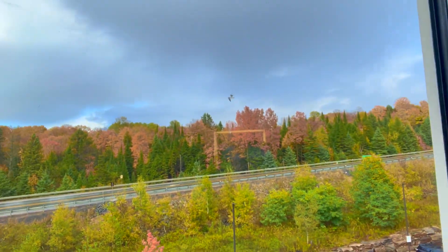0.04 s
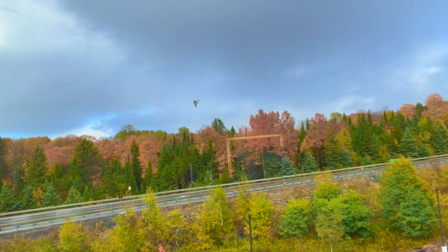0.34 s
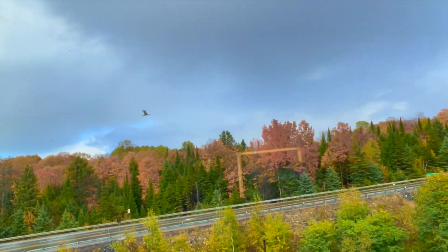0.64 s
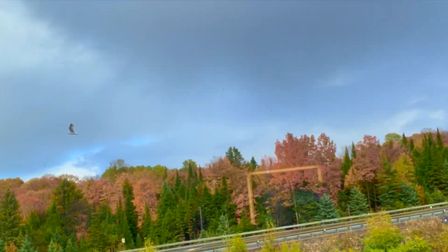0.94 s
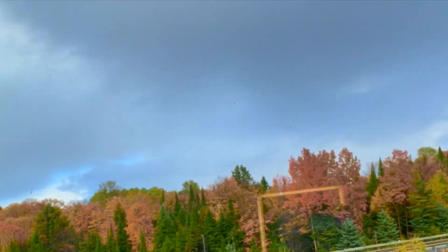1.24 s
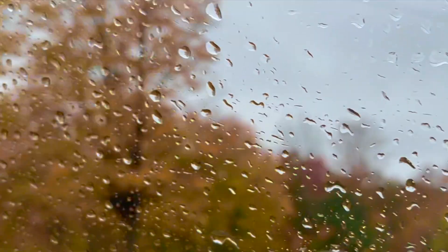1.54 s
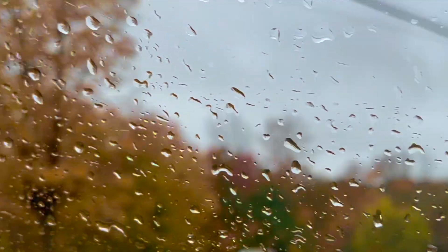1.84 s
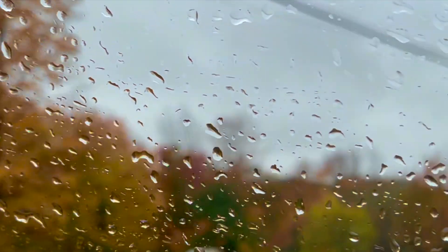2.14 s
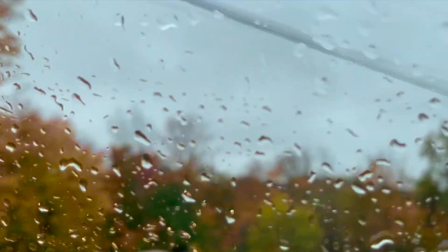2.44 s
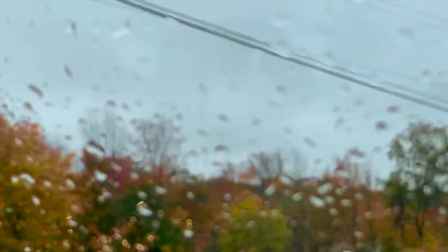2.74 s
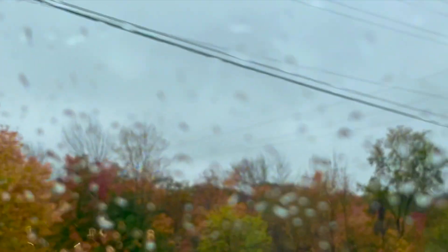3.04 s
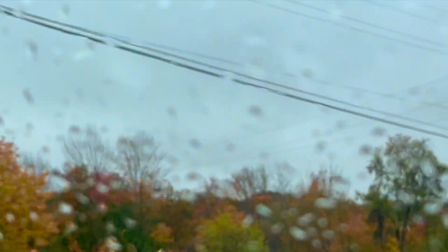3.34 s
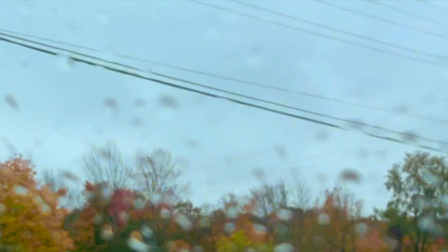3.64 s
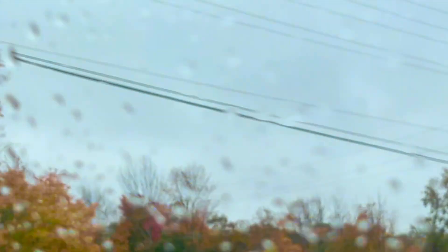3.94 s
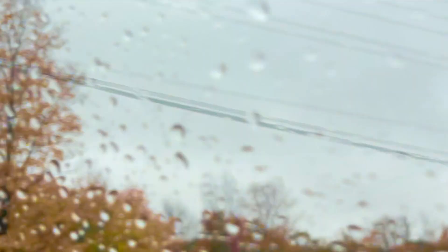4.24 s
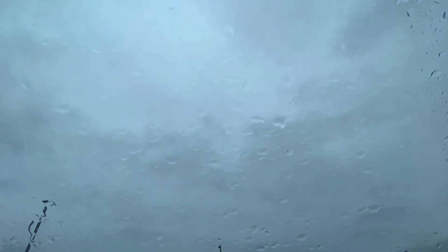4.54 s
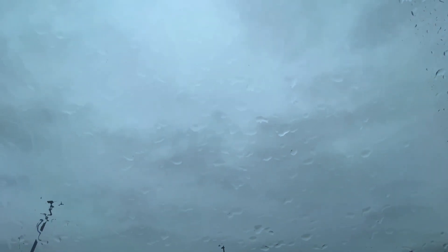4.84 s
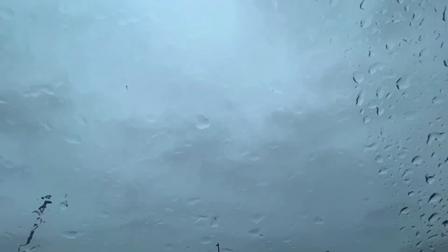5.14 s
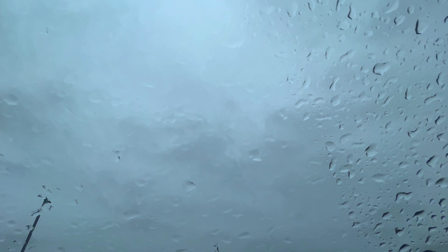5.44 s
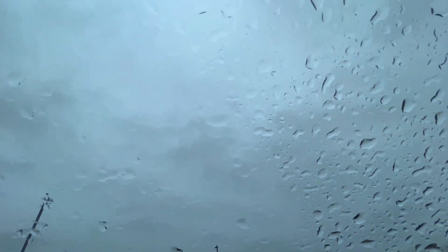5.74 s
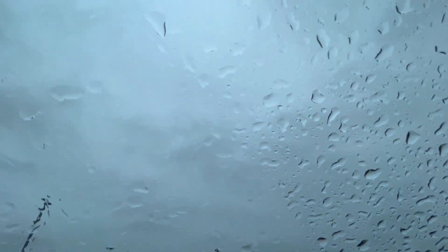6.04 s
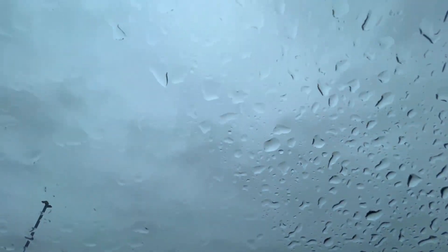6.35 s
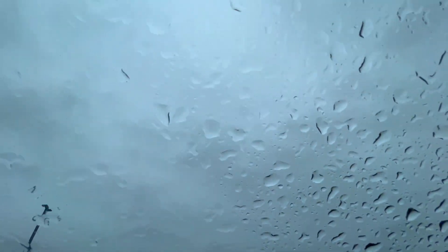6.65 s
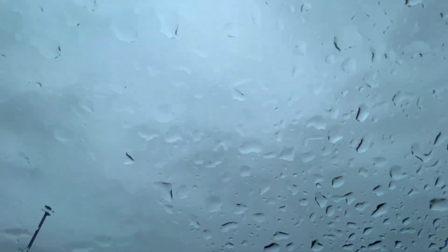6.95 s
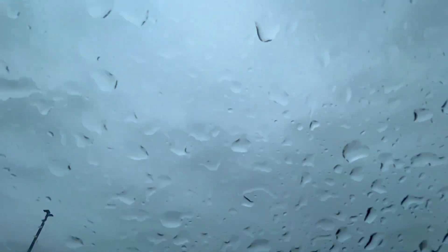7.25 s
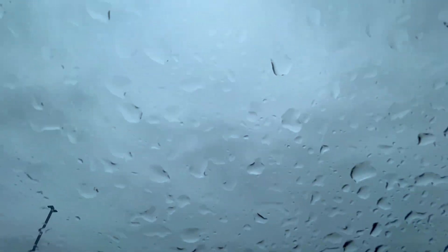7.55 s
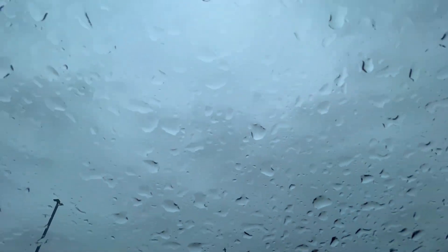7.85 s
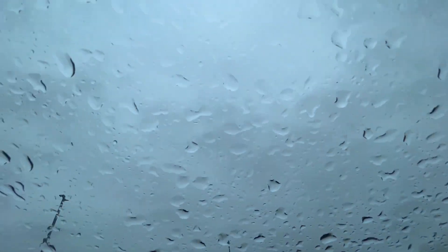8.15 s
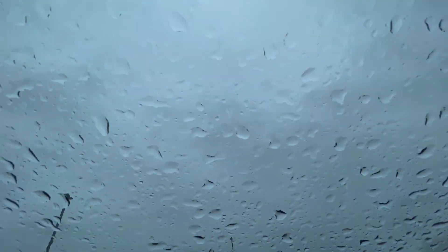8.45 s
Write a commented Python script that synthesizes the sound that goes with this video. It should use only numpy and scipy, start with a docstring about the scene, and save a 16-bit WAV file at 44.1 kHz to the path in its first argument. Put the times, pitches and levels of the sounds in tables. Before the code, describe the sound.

The sound is heard from inside a moving car. From the start, wind buffets the side window with a deep, lumpy rumble that swells in gusts, and short dull thuds cluster between about 0.8 and 2 seconds. A tiny, very faint squeak comes at 0.3 seconds. At 1.5 seconds rain sets in on the glass: a soft, fine wash with single drops ticking above it, busiest until about 3.5 seconds. A strong gust swells near 3.9 seconds, followed by the loudest double thump at about 4.2. After further gusts around 4.8 and 5.2 seconds, the wind dies away and is gone by 6. The rest is much quieter, with rain pattering on and a few sharper drops near 6.9 and 8.3 seconds. Low tyre rumble and a faint engine drone continue underneath until the end, just past 8.5 seconds.

```python
"""Wind buffets the side window of a moving car: swirls of air rumble and thud, then die away.
After a second and a half rain sets in on the glass. Countless droplets blur into a fine wash,
and single drops tick above it. A tiny squeak comes in an early gust.
Underneath, the tyres rumble through the car's body and the engine drones low."""
import sys
import numpy as np
from scipy import signal
from scipy.io import wavfile
from scipy.ndimage import uniform_filter1d

SR = 44100
rng = np.random.default_rng(int(sys.argv[2]) if len(sys.argv) > 2 else 0)


def file_out(sig):
    """Save sig as 16-bit WAV at sys.argv[1]."""
    # one column per channel
    cols = np.atleast_2d(sig).T
    # limit, then scale
    lim = np.clip(cols, -1, 1)
    pcm = np.round(lim * 32767).astype(np.int16)
    wavfile.write(sys.argv[1], SR, pcm)


N = 375379

# how much fine spray reaches the glass: t/s, level/dB added to SPRAY_DB
SPRAY_AMOUNT = [(1.6, -1.5), (3.0, -1), (3.3, -3), (3.7, -1.5), (5.2, -3.5), (5.7, -10), (6.7, -5.5),
                (7.8, -9), (8.5, -7)]
SPRAY_DB = -78


def wind(deepen=0.35):
    """Air rumbles past the window in lumps, louder and deeper in each gust, then dies away."""
    # steady flow: t/s, level/dB, brightness/(dB per octave)
    airflow = [(0.0, -39.5, 1), (0.6, -39, 1), (1.2, -34, 1.5), (1.9, -40.5, 1.5), (2.4, -41, 0.5),
               (3.0, -39, 1.5), (3.35, -41.5, -1), (3.95, -40, 1), (4.45, -39, -2), (5.25, -37, -1.5),
               (5.6, -50, -2.5), (6.0, -67, 2)]
    # gusts on top of it: t/s, rise/dB, half-length/s
    gusts = [(0.11, 5, 0.11), (0.43, 4, 0.025), (1.27, 0.5, 0.1), (1.462, 6.5, 0.1), (1.79, 6.5, 0.06),
             (2.108, 6, 0.16), (2.72, 6.5, 0.034), (3.045, 5, 0.089), (3.866, 8, 0.16), (4.27, 4, 0.12),
             (4.757, 6, 0.13), (5.176, 0, 0.18)]
    # tone of the swirling air: f/Hz, level/dB
    colour = [(22, -19.5), (35, -10.5), (60, -7), (100, 3), (200, 0.5), (340, -6.5), (450, -10.5),
              (680, -21), (1000, -26), (1500, -50), (2300, -51), (3300, -60.5), (5000, -68.5)]
    # how alike left and right are: f/Hz, likeness (1 = the same)
    likeness = [(40, .94), (150, 0.89), (500, 0.96), (1100, 0.88), (2200, 0.6), (5000, .6)]
    # left minus right: f/Hz, level/dB
    balance = [(35, 10.5), (80, 1), (170, 0.5), (350, -2), (700, -3.5), (2000, -7.5)]
    strength_db, brightness = in_time(airflow)
    rise_db = swells(gusts)
    tilt = brightness - deepen * rise_db   # bigger swirls rumble lower
    air = coloured(turbulence(), colour, likeness, balance, tilt_db=tilt, flutter_db=1.37)
    return butter(air, 3000, "low") * from_db(strength_db + rise_db + 0.99 * drift(22) - 0.2)


def thuds(attack_s=0.0014, length_s=0.04):
    """Single swirls of air thump the cabin: a sudden, short burst of pressure with a dull rush on top."""
    # one swirl a row: t/s, thump level/dB, f/Hz, rush level/dB
    swirls = [(0.106, -21.5, 151, -46), (0.268, -21, 140, -32), (0.754, -23, 86, -35),
              (0.898, -17, 170, -31), (0.919, -18.5, 102, -26.5), (1.006, -19.5, 186, -27.5),
              (1.164, -18.5, 109, -27.5), (1.227, -19, 128, -36), (1.259, -21, 255, -40.5),
              (1.413, -22.5, 103, -37), (1.564, -23, 143, -48), (1.728, -16.5, 142, -40),
              (2.014, -19.5, 145, -34), (2.066, -21, 104, -36.5), (3.566, -23, 110, -42),
              (4.137, -10, 111, -32), (4.189, -10.5, 100, -39), (5.153, -23, 46, -51),
              (5.273, -25, 108, -46)]
    out, t = np.zeros((2, N)), np.arange(SR // 4) / SR
    burst = (1 - np.exp(-(t / attack_s) ** 2)) * np.exp(-(t / length_s) ** 2)
    noises = rng.standard_normal((len(swirls), 2, 2, len(t) + SR // 10))
    for (s, thump_db, hz, rush_db), (thump_noise, rush_noise) in zip(swirls, noises):
        thump = from_db(thump_db - 4.5) * swirl(thump_noise, 0.63 * hz, 1.48 * hz)
        rush = from_db(rush_db - 3.5) * swirl(rush_noise, 250, 564) * from_db([[-1.3], [1.3]])
        add(out, (thump + rush) * burst, s)
    return out


def swirl(noise, low_hz, high_hz, side_db=-14.5):
    """Swirling air that keeps an even strength and carries little above its own pitch."""
    band = butter(noise, [low_hz, high_hz], "band")
    power = np.abs(uniform_filter1d(band ** 2, size=SR // 60, axis=1))
    even = band / np.sqrt(power + 1e-20)
    mid, side = butter(even, high_hz * 1.3, "low")[:, SR // 10:]   # skip ahead until the filters settle
    return stereo(mid, from_db(side_db) * side)


def rain(start_s=1.53, rise_s=0.031, wash_db=-55.0):
    """Droplets drum on the glass and blur into a wash; the finest spray adds a thin crackle."""
    # tone of the wash through the glass: f/Hz, level/dB
    wash_colour = [(250, -3), (450, 5), (750, 8), (1200, 4.5), (1700, -2.5), (2400, -1.5), (3300, -10),
                   (4300, -20), (5500, -28), (8000, -55.5), (14000, -57)]
    # tone of the finest droplets: f/Hz, level/dB
    spray_colour = [(2500, -10.5), (4000, 7.5), (5800, 8.5), (7000, -13.5), (8500, 0), (10000, -9),
                    (14000, -24)]
    # how alike left and right are: f/Hz, likeness
    likeness = [(400, 1), (1000, 0.76), (2200, 0.83), (4000, 0.91), (10000, 0.47)]
    # left minus right: f/Hz, level/dB
    balance = [(400, -0.1), (1000, -0.6), (8000, .3)]
    # flurries of thicker rain: t/s, rise/dB, half-length/s
    flurries = [(1.76, 1, 0.2), (2.14, 1.8, 0.073), (2.4, 1.8, 0.028), (3.03, -0.3, 0.1),
                (3.45, 2.5, 0.066), (3.85, 1.2, 0.08), (6.7, 0.4, 0.51)]
    amount_db, = in_time(SPRAY_AMOUNT)
    fade_in = .5 + .5 * np.tanh((np.arange(N) / SR - start_s) / (2 * rise_s))
    flurry_db = swells(flurries)
    spatter = np.maximum(drift(18), 0) ** 2   # quick, random jumps in level
    droplets = patter(per_s=1200, spread_db=3.0, blur=1.33)
    wash = coloured(droplets, wash_colour, likeness, balance, flutter_db=1.1)
    fine_droplets = patter(per_s=650, spread_db=0.5, blur=1.5)
    spray = coloured(fine_droplets, spray_colour, likeness, balance)
    wash_gain = from_db(wash_db + 0.03 * amount_db + flurry_db + 0.31 * spatter)
    spray_gain = from_db(SPRAY_DB + amount_db + 0.9 * flurry_db + .5 * spatter)
    return fade_in * (wash_gain * wash + spray_gain * spray)


def patter(per_s, spread_db, blur):
    """Random hits of uneven size over a blur of countless smaller ones."""
    sizes = from_db(spread_db * np.minimum(rng.exponential(1, N), 5))
    lands = rng.random(N) < per_s * from_db(2 * drift(5)) / SR
    return rms_one(sizes * lands) * rng.choice([-1, 1], (2, 2, N)) + blur * turbulence()


def heavy_drops():
    """A few big drops land close by and stand out of the wash."""
    # one drop a row: t/s, tap level/dB, tap f/Hz, splash level/dB, splash f/Hz
    drops = [(1.64, -47, 2300, -73, 6000), (1.6985, -44, 3500, -53, 4400), (1.754, -54, 3500, -59, 7100),
             (1.861, -50, 3300, -75, 6000), (1.9195, -51, 4200, -57, 5400), (1.987, -47, 2600, -58, 4500),
             (2.098, -50, 3500, -61, 4500), (2.1385, -41, 2460, -65, 6000), (2.228, -54, 4000, -55, 7100),
             (2.3932, -46, 2400, -64, 6000), (2.702, -47, 2400, -49, 5400), (2.713, -54, 3500, -57, 5500),
             (2.7885, -50, 3600, -64, 7000), (2.9433, -56, 3000, -61, 6800), (3.1312, -46, 3300, -53, 3600),
             (3.2065, -48, 2600, -62, 6500), (3.396, -49, 2800, -62, 4000), (3.447, -44, 4180, -64, 8000),
             (3.4635, -44, 3660, -58, 8500), (3.482, -56, 3500, -59, 7500), (3.5145, -56, 3500, -61, 6700),
             (3.83, -55, 3500, -60, 7200), (4.174, -55, 4000, -57, 6400), (4.914, -54, 3700, -63, 7000),
             (5.011, -55, 4000, -59, 5800), (5.134, -51, 4000, -60, 4800), (6.319, -54, 3800, -63, 6000),
             (6.8225, -51, 3800, -59, 5500), (6.8964, -43.5, 3600, -58, 3600),
             (7.38, -60, 4000, -64, 11200), (8.316, -41, 2500, -68, 4990), (8.4565, -46, 2450, -65, 4500)]
    out = np.zeros((2, N))
    for (s, *tap_and_splash), noise in zip(drops, rng.standard_normal((len(drops), 2, SR // 20))):
        add(out, from_db(-1.5) * drop(noise, *tap_and_splash, splash_s=0.003), s)
    return out


def light_drops(count=260, tap_hz=3400, splash_hz=6000):
    """Small drops tick at random, louder in thicker spray; smaller ones are higher and fainter."""
    out = np.zeros((2, N))
    amount_db, = in_time(SPRAY_AMOUNT)
    first_s = SPRAY_AMOUNT[0][0]
    chances = rng.random((count, 3))
    for (when, pitch, softness), noise in zip(chances, rng.standard_normal((count, 2, SR // 40))):
        s = first_s + when * (N / SR - first_s - .05)
        octave = 1.6 * (pitch - .5)
        above_spray_db = 12 - 7 * octave - 1.4 * np.log(softness + .03)
        db = SPRAY_DB + amount_db[int(s * SR)] + above_spray_db
        tick = drop(noise, db + 7, tap_hz * 2 ** octave, db, splash_hz * 2 ** octave, splash_s=0.0022)
        add(out, tick, s)
    return out


def drop(noise, tap_db, tap_hz, splash_db, splash_hz, splash_s, width_octaves=0.55):
    """A drop taps the glass for two or three vibrations and splashes with a short, high hiss."""
    t = np.arange(noise.shape[1]) / SR
    age = t * tap_hz / 0.82   # the tap is strongest after 0.82 vibrations
    tap = age * np.exp(1 - age) * np.sin(2 * np.pi * tap_hz * t)
    edges_hz = splash_hz * 2 ** (np.array([-.5, .5]) * width_octaves)
    fade = np.exp(-t / splash_s) + 0.073 * np.exp(-t / .012)   # a quick fall, then a faint tail
    mid, side = butter(noise * fade, edges_hz, "band")
    splash = stereo(mid, .3 * side) / np.abs(mid).max()
    return from_db(tap_db) * tap + from_db(splash_db) * splash


def road():
    """The rolling tyres rumble through the car's body."""
    # tone of tyres and body: f/Hz, level/dB
    colour = [(22, -4.5), (33, -2.5), (46, 2), (75, -0.5), (105, -1), (160, -5), (270, -9.5), (350, -14.5),
              (600, -22), (1500, -26), (3000, -60.5)]
    # how alike left and right are: f/Hz, likeness
    likeness = [(50, 0.69), (200, 0.77), (600, 0.42)]
    # left minus right: f/Hz, level/dB
    balance = [(60, 2.5), (180, 4.8), (500, .5)]
    return from_db(-46.0) * coloured(turbulence(), colour, likeness, balance, flutter_db=1.0)


def engine():
    """The engine's rapid firing makes a low, slightly wavering drone, louder on the left."""
    # how fast it fires: t/s, f/Hz
    firing = [(0, 66.47), (5.8, 67.6), (7.2, 67.94), (8.5, 66.77)]
    # tones of the drone: multiple of the firing rate, level/dB
    tones = [(1, -61), (2, -57), (3, -57)]
    firing_hz, = in_time(firing)
    phase = 2 * np.pi * np.cumsum(firing_hz * (1 + 0.0034 * drift(3.0))) / SR
    drone = sum(np.sqrt(2) * from_db(db + 1.1 * drift(2.1)) * np.sin(k * phase) for k, db in tones)
    return drone * from_db([[1.8], [-2.2]])


def squeak(start_s=.272, ring_hz=3140, ring_s=0.026, rasp_hz=3250, rasp_s=0.02, attack_s=0.0057):
    """Something gives a tiny squeak in an early gust: a short rasp and a fading ring."""
    out, t = np.zeros((2, N)), np.arange(SR // 10) / SR
    noise = butter(rng.standard_normal(len(t)), [.93 * rasp_hz, 1.07 * rasp_hz], "band")
    rasp = rms_one(noise) * np.exp(-t / rasp_s)
    ring = np.sin(2 * np.pi * ring_hz * t) * np.exp(-t / ring_s)
    sound = from_db(-65) * (rasp + ring) * (1 - np.exp(-t / attack_s))
    add(out, stereo(sound, 0), start_s)
    return out


def turbulence():
    """Two separate random noises, each with a mid and a side part (see stereo)."""
    return rng.standard_normal((2, 2, N))


def coloured(source, colour, likeness, balance, tilt_db=0, flutter_db=0):
    """Shape noise in half-octave bands, each with its own level, stereo width and flutter."""
    out, power = np.zeros((2, N)), 0
    edges = 20 * 2 ** np.arange(0, 10, .5)
    for k, (low, high) in enumerate(zip(edges, edges[1:])):
        if high < colour[0][0] or low > colour[-1][0]:
            continue
        hz = np.sqrt(low * high)
        mid, side = butter(source[k % 2], [low, high], "band") * from_db(at_hz(colour, hz))
        alike = np.clip(at_hz(likeness, hz), 0, 1)
        mid, side = np.sqrt(1 + alike) * mid, np.sqrt(1 - alike) * side
        power += np.mean(mid ** 2)
        octaves = np.log2(np.clip(hz, 40, 700) / 160)   # the tilt is a seesaw around 160 Hz
        gain = from_db(tilt_db * octaves + (flutter_db * drift(16) if flutter_db else 0))
        pan = from_db(at_hz(balance, hz) * np.array([[.5], [-.5]]))
        out += gain * stereo(mid, side) * pan
    return out / np.sqrt(power)


def swells(rows):
    """Each gust or flurry is a bell-shaped rise, in dB."""
    t = np.arange(N) / SR
    return sum(rise_db * np.exp(-((t - s) / length) ** 2) for s, rise_db, length in rows)


def drift(rate):
    """A smooth random wobble of typical size 1, changing about rate times a second."""
    r = np.exp(-80 * np.pi * rate / SR)
    slow = signal.lfilter([1], [1, -2 * r, r * r], rng.standard_normal(N // 40 + 2002))[2000:]
    return np.interp(np.arange(N) / 40, np.arange(len(slow)), rms_one(slow))


def stereo(mid, side):
    """Left and right from what they share (mid) and what sets them apart (side)."""
    return np.array([mid + side, mid - side])


def from_db(db):
    """Turn decibels into a multiplier."""
    return 10 ** (np.asarray(db) / 20)


def rms_one(x):
    """Scale to an average strength (rms) of 1."""
    return x / np.sqrt(np.mean(x ** 2) + 1e-20)


def in_time(rows):
    """Turn a timed table into curves with one value per sample."""
    s, *columns = np.transpose(rows)
    return [np.interp(np.arange(N) / SR, s, c) for c in columns]


def at_hz(points, hz):
    """Read a table at any frequency, with octaves evenly spaced."""
    points = np.array(points)
    return np.interp(np.log(hz), np.log(points[:, 0]), points[:, 1])


def butter(x, hz, kind, order=2):
    """A smooth filter that keeps the lows or one band."""
    sections = signal.butter(order, np.clip(hz, 10, .45 * SR), kind, fs=SR, output="sos")
    return signal.sosfilt(sections, x)


def add(out, sound, s):
    """Mix a short stereo sound in at s seconds."""
    start = max(int(s * SR), 0)
    out[:, start:start + sound.shape[1]] += sound[:, :N - start]


def scene():
    """Everything heard inside the car."""
    return wind() + thuds() + squeak() + rain() + light_drops() + heavy_drops() + road() + engine()


def record(dry, whine_hz=15735, whine_db=-95, beat_hz=15, cutoff_hz=16000):
    """The microphone adds a faint hiss and a thin, trembling whine; the highest treble is cut."""
    t = np.arange(N) / SR
    hiss = from_db(-84.5) * (0.74 * rng.standard_normal(N) + .55 * rng.standard_normal((2, N)))
    hiss = butter(hiss, 14000, "low", order=8)
    whine = np.sin(2 * np.pi * whine_hz * t) + .5 * np.sin(2 * np.pi * (whine_hz + beat_hz) * t)
    treble_cut = signal.ellip(10, .1, 80, cutoff_hz, fs=SR, output="sos")
    return signal.sosfilt(treble_cut, dry + hiss + from_db(whine_db) * whine)


dry = scene()
out = record(dry)
file_out(out)
```